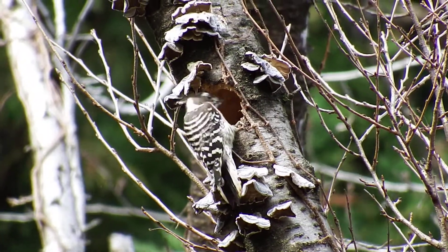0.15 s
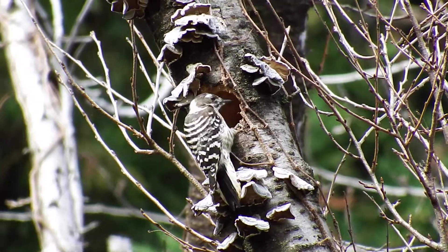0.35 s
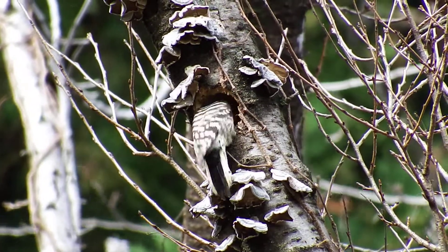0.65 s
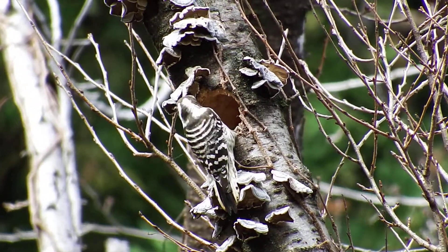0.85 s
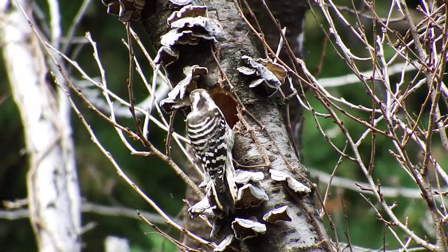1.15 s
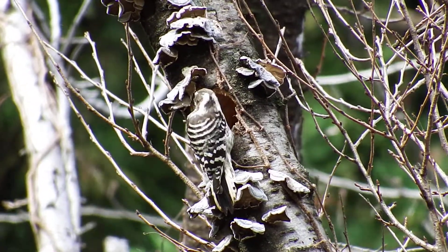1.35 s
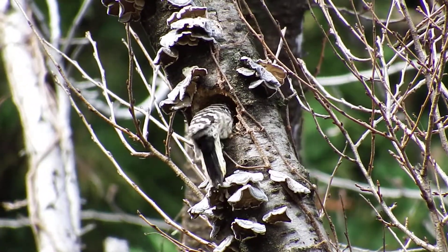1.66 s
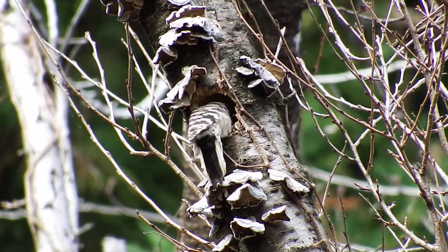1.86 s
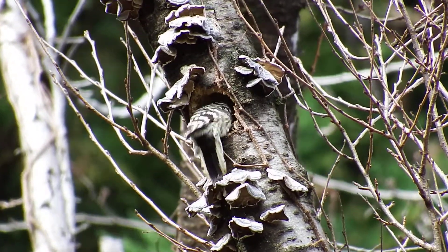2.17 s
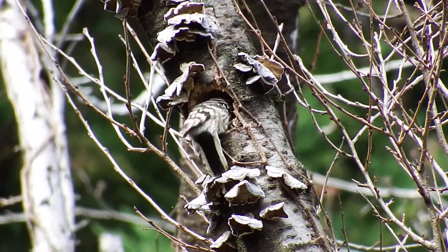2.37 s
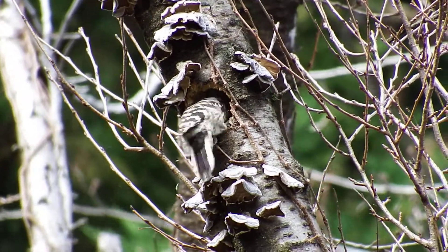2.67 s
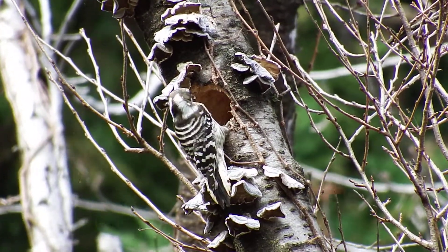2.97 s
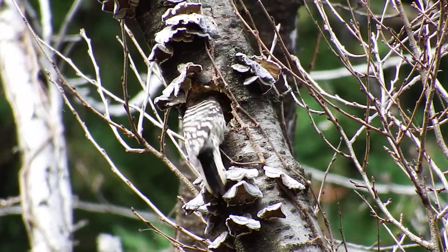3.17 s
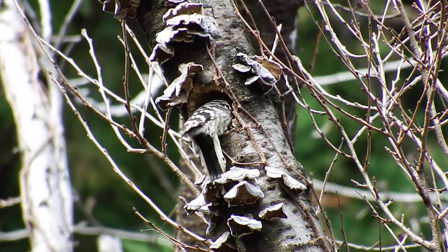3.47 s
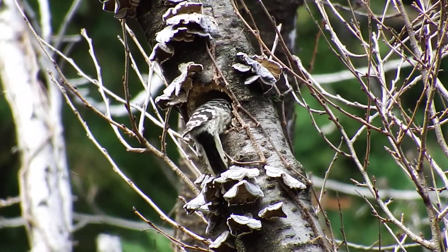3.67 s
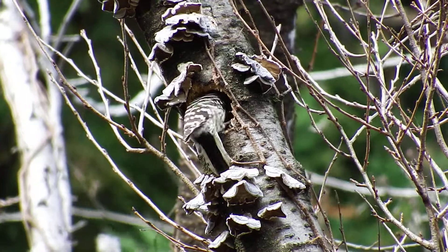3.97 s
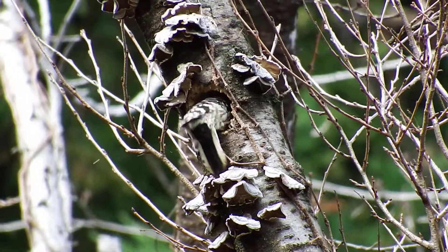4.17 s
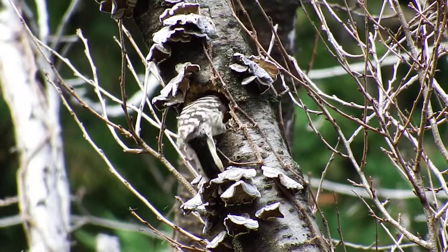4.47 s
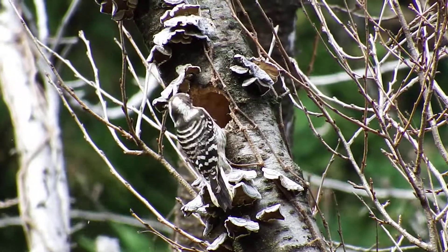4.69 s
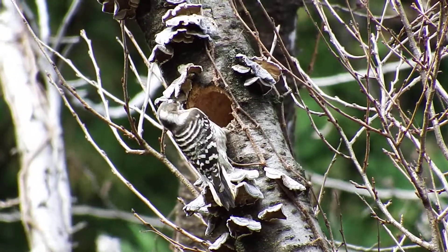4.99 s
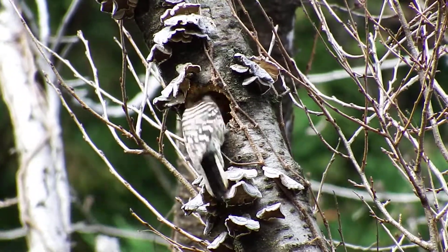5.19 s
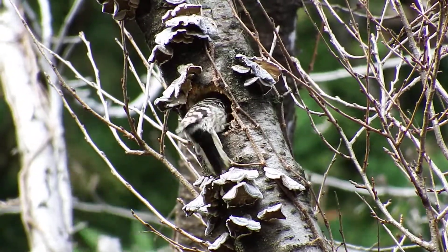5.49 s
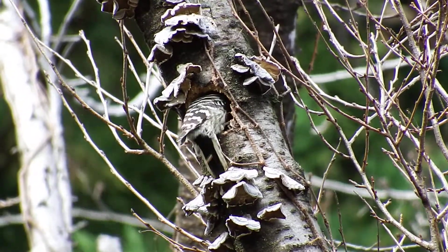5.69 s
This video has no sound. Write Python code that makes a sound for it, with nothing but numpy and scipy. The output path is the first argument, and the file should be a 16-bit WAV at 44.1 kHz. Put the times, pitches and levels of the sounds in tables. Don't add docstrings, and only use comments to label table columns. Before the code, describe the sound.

Outdoor woodland, breezy. A steady soft wash of leaves and slight hiss lies under small birds giving thin, gliding whistles and hoarse chirps. Wind pops and flutters low against the stereo microphone, mostly in the first four seconds. A faint far motor whines early. Around five seconds a woodpecker gives a few soft, uneven knocks, each a small tick and dull woody thud. Treble is muffled.

```python
import sys
import numpy as np
from scipy import signal
from scipy.fft import rfft, irfft
from scipy.io import wavfile
from scipy.ndimage import uniform_filter1d

SR = 44100
rng = np.random.default_rng(int(sys.argv[2]) if len(sys.argv) > 2 else 0)


def level_to_linear(level):
    exponent = np.asarray(level, float) / 20
    return 10 ** exponent


def generate_wav(signal):
    frames = np.transpose(np.atleast_2d(signal))
    scaled = np.clip(frames, -1, 1) * 32767
    pcm = np.round(scaled).astype(np.int16)
    wavfile.write(sys.argv[1], SR, pcm)


N = 257632


def level(x, db):
    return x * level_to_linear(db) / np.sqrt(np.mean(x ** 2))


def colour(x, shape):
    hz, db = np.transpose(shape)
    gain_db = np.interp(np.log(np.fft.rfftfreq(N, 1 / SR) + 1), np.log(hz), db)
    return irfft(rfft(x) * level_to_linear(gain_db), N)


def noise(shape, channels=1):
    return level(colour(rng.standard_normal((channels, N)), shape), 0)


def walk(rate, size=N):
    hold = max(int(SR / rate), 1)
    steps = np.repeat(rng.standard_normal(size // hold + 1), hold)
    slewed = uniform_filter1d(uniform_filter1d(steps, hold), hold)
    return 1.325 * slewed[:size]


def ring(modes, push_s):
    t = np.arange(SR // 10) / SR
    y = sum(level_to_linear(db) * np.sin(2 * np.pi * hz * t) * 1000. ** (-t / t60) for hz, db, t60 in modes)
    y = np.convolve(y, np.hanning(int(push_s * SR) + 3))[:len(t)]
    return y / np.abs(y).max()


def add(out, sound, s):
    i = int(s * SR)
    out[i:i + len(sound)] += sound[:N - i]


def rustle():
    # time in [s], level in [dB].
    air = [(0.0, -49), (0.75, -49.5), (2.76, -48.5), (3.64, -49.5), (4.13, -47.5), (5.84, -48)]
    # frequency in [Hz], density in [dB per Hz].
    leaf_tone = [(60, -13), (150, -16.5), (320, -2), (560, -1.5), (760, 0), (1400, -0.5), (2050, 1.5),
                 (2400, -4.5), (3000, -1.5), (3900, -0.5), (5000, -4.5), (8000, -5)]
    s, db = np.transpose(air)
    field = noise(leaf_tone) + 0.12 * noise(leaf_tone, channels=2)
    return field * level_to_linear(np.interp(np.arange(N) / SR, s, db) + 8 + .5 * walk(6))


def wind():
    # frequency in [Hz], density in [dB per Hz].
    rumble_tone = [(20, 12.5), (90, 3.5), (150, -2.5), (300, -7.5), (500, -17.5), (900, -53)]
    # peak in [s], half length in [s], rumble in [dB],
    # left minus right in [dB].
    gust_rows = [(0.12, 0.048, -75, -15), (0.485, 0.13, -60, 7), (0.854, 0.14, -81, 1),
                 (1.147, 0.087, -66, -2), (3.4, 0.21, -73, 8), (1.624, 0.1, -76, 6), (1.44, 0.08, -60, 2),
                 (1.85, 0.17, -63, 4), (2.207, 0.16, -61, 7), (2.416, 0.16, -60.5, 16.5),
                 (2.78, 0.19, -57, 2), (3.108, 0.12, -58, -5), (3.764, 0.044, -60, 4),
                 (4.2, 0.041, -70.5, 13), (4.462, 0.034, -65, -3), (4.965, 0.12, -65, -8),
                 (5.31, .07, -69, 5)]
    # time in [s], peak in [dB], deep part in [dB].
    pops_left = [(0.459, -53, 8), (0.592, -52, 10), (1.398, -25.5, -8.5), (1.409, -37, -2),
                 (1.474, -37, -16), (1.499, -31, -25), (2.096, -36, -7), (2.124, -30.5, -14),
                 (2.195, -39, -13), (2.236, -33.5, 2), (2.264, -30, -10), (2.305, -34, -21),
                 (2.325, -27, -25), (2.335, -27.5, -27), (2.364, -35, -13), (2.402, -31, -31),
                 (2.426, -31, -24), (2.477, -31.5, 0), (2.653, -31, -6), (2.734, -32, -7),
                 (2.793, -30.5, -21), (2.821, -35, 2), (2.859, -30.5, -24), (2.893, -37, -2),
                 (3.082, -30, -16), (3.132, -38, 8), (3.528, -30.5, -11), (3.606, -35.5, 16),
                 (3.859, -40, 9), (5.307, -39, 11)]
    # time in [s], peak in [dB], deep part in [dB].
    pops_right = [(0.099, -46, 8), (0.131, -55, 8), (0.316, -34.5, -15), (0.43, -33, 13), (1.204, -49, 8),
                  (1.468, -53, 6), (2.045, -35.5, -10), (2.318, -36, -6), (2.352, -34, 6), (2.648, -42, 4),
                  (2.715, -50, 4), (3.052, -41, 11), (3.09, -27.5, -6), (3.104, -31, -12), (3.127, -30, -1),
                  (3.255, -27, -15), (3.765, -50, 8), (4.465, -56, 8)]
    calm_db, calm_fall_db_per_s = -70, 1
    t = np.arange(N) / SR
    out = noise(rumble_tone, channels=2)
    for port, lean, pops in zip(out, (.5, -.5), (pops_left, pops_right)):
        gust = level_to_linear(calm_db - calm_fall_db_per_s * t)
        for s, half_s, db, side_db in gust_rows:
            gust += level_to_linear(db + lean * side_db) * np.exp(-((t - s) / half_s) ** 2)
        port *= gust * level_to_linear(8.5 + 9.5 * np.minimum(walk(45), 1.2))
        for (at, peak_db, deep_db), chance in zip(pops, rng.standard_normal((len(pops), 2))):
            main = (320 * (1 + 0.11 * chance[0]), 0, .022)
            deep = (145 * (1 + .2 * chance[1]), deep_db + 0.5, .04)
            add(port, level_to_linear(peak_db) * ring([main, deep], 0.0017), at - .0025)
    return out


def birds():
    # start in [s], end in [s], rate in [Hz], pitch swing in [Hz], depth [0-1].
    trills = [(0.14, 0.21, 46, 330, 0.9), (1.84, 2.2, 87, 130, 0.2), (4.63, 4.77, 210, 180, 0.6),
              (6.7, 5.6, 68.9, 230, 0.26), (4, 6, 160, 110, 0.4)]
    flicks = [(1.143, 0.012, 2500, 4800, -39.5), (1.467, 0.026, 2130, 4550, -37),
              (4.843, .011, 2580, 3700, -39.5), (1.252, 0.03, 4380, 2340, -40.5),
              (1.285, 0.015, 4340, 2900, -38.5), (3.412, .022, 4080, 3450, -40),
              (1.637, .023, 3980, 2880, -46)]
    climbs = [(1.156, 0.068, 4280, 5680, -34.5), (1.488, .095, 4400, 6800, -39),
              (1.705, 0.085, 4420, 5430, -40.5), (2.752, 0.079, 4330, 6690, -47),
              (3.015, 0.052, 4370, 5130, -40)]
    rises = [(.09, 0.088, 4050, 4420, -45.5), (.312, 0.021, 3950, 4520, -39),
             (.375, 0.023, 3370, 3620, -45.5), (.462, .04, 3500, 3720, -44),
             (2.42, 0.094, 3060, 3375, -47.5), (2.505, .04, 2970, 3460, -39),
             (2.705, .075, 2740, 3523, -39), (2.775, 0.11, 3700, 4043, -41),
             (2.96, 0.087, 4120, 4450, -44.5), (3.335, 0.057, 4140, 4360, -40),
             (3.76, 0.1, 4170, 4540, -46), (3.92, .09, 3510, 3830, -51), (4.0, 0.13, 3760, 3860, -52),
             (4.46, .09, 3675, 4075, -43.5), (4.55, 0.074, 4230, 4720, -46), (4.92, .16, 3390, 3440, -46.5),
             (4.78, 0.041, 3800, 3920, -48), (4.875, 0.054, 3820, 3910, -42.5),
             (4.93, 0.099, 4055, 4205, -41.5), (5.04, .075, 4260, 4520, -43), (5.11, .065, 4500, 4600, -43),
             (5.35, .08, 3454, 4220, -41), (5.53, 0.037, 3800, 4360, -46.5), (5.655, .095, 3720, 4350, -41)]
    falls = [(0.001, 0.02, 3970, 3880, -37.5), (.165, 0.045, 4360, 4160, -50),
             (.185, .08, 4150, 3700, -45.5), (.332, 0.052, 4470, 3910, -42.5),
             (.498, 0.037, 3720, 3520, -43), (.55, 0.047, 3370, 3200, -49),
             (2.035, 0.059, 3500, 3430, -46.5), (2.29, .07, 3704, 3636, -45.5),
             (2.545, 0.12, 3410, 3398, -39), (2.81, 0.11, 3380, 3344, -45), (3.07, 0.072, 4050, 3976, -46),
             (3.22, 0.056, 4350, 4090, -48), (3.293, 0.047, 4520, 4140, -42),
             (3.385, .03, 4330, 4050, -39.5), (3.86, 0.081, 4400, 3950, -45.5),
             (4.645, .115, 3870, 3520, -47), (4.76, .06, 5700, 5630, -46), (4.825, 0.049, 4140, 3756, -39),
             (4.92, 0.078, 4630, 4380, -46), (5.17, 0.043, 4540, 4590, -39), (5.225, 0.12, 4654, 4510, -44),
             (5.46, 0.079, 4150, 3750, -47), (5.565, 0.025, 4220, 3880, -40.5),
             (5.77, .04, 5490, 5410, -51)]
    chirrs = [(1.17, 0.09, 3800, 3800, -49), (1.225, 0.064, 5600, 4740, -40),
              (1.585, 0.041, 6750, 5300, -39), (1.77, .16, 4150, 4050, -42.5),
              (1.91, 0.083, 4100, 4050, -52), (1.795, .1, 3500, 3150, -42), (2.29, .08, 3500, 3800, -49),
              (5.44, 0.09, 3600, 3700, -46.5), (2.77, 0.15, 3523, 3700, -44),
              (2.18, .07, 3105, 3110, -49.5), (2.0, 0.122, 3600, 3700, -51), (2.95, .2, 3600, 3900, -50),
              (3.06, 0.13, 4800, 4400, -50), (3.92, 0.16, 4200, 3990, -47.5),
              (4.17, .16, 2900, 3300, -47.5), (4.32, 0.14, 3300, 3550, -51), (4.4, 0.16, 3890, 4000, -49),
              (4.66, 0.04, 2960, 2900, -61), (5.05, 0.21, 5300, 5200, -46), (5.3, 0.26, 5250, 4700, -49)]
    # notes, pitch bend (under 1 early, over 1 late), crest place [0-1],
    # ends under crest in [dB], pitch wander in [Hz], left minus right in [dB].
    kinds = [(flicks, .9, .5, 6, 30, -1.5), (climbs, .75, .35, 4, 40, 0), (rises, .7, .6, 4, 75, -1.2),
             (falls, 1.3, .3, 3, 70, -1.2), (chirrs, 1, .45, 5, 320, -1)]
    edge_s = .008
    t, out = np.arange(N) / SR, np.zeros((2, N))
    swing_hz, pulse = np.zeros(N), np.ones(N)
    for start, end, rate, hz, depth in trills:
        beat = ((t > start) & (t < end)) * np.sin(2 * np.pi * rate * (t - start))
        swing_hz += hz * np.roll(beat, int(SR / rate / 4))
        pulse += np.clip(depth, 0, 1) * beat
    wander, flutter = walk(700), walk(140)
    for kind, (notes, bend, crest, fade_db, hoarse_hz, side_db) in enumerate(kinds):
        for row, (s, length, first_hz, last_hz, db) in enumerate(notes):
            span = slice(int(s * SR), int((s + length) * SR))
            size = len(t[span])
            u = np.arange(size) / size
            own = slice(4001 * row + 30011 * kind, None)
            glide_hz = first_hz + (last_hz - first_hz) * u ** bend
            pitch = glide_hz + swing_hz[span] + hoarse_hz * wander[own][:size]
            swell_db = -fade_db * np.interp(u, [0, np.clip(crest, .1, .9), 1], [1, 0, 1]) ** 2
            flutter_db = 3.2 * flutter[own][:size]
            edges = signal.windows.tukey(size, min(edge_s * SR / size, 1))
            loud = level_to_linear(db + swell_db + flutter_db) * pulse[span] * edges
            phase = 2 * np.pi * np.cumsum(pitch) / SR
            song = np.sqrt(2) * loud * (np.sin(phase) + level_to_linear(-27) * np.sin(2 * phase))
            out[:, span] += np.outer([level_to_linear(side_db / 2), level_to_linear(-side_db / 2)], song)
    return out


def burst(hz, seconds):
    size = int(seconds * SR)
    return np.hanning(size) * np.sin(2 * np.pi * hz * np.arange(size) / SR)


def woodpecker():
    # tick in [s], thin tick in [dB], knock follows by [ms], knock peak in [dB],
    # contact in [ms].
    taps = [
        (.3944, -26, 3.6, -55, 1.5),
        (4.9013, -19, 3.7, -50, 1.5),
        (4.9474, -13, 4.2, -25.5, .8),
        (5.0502, -13, 3.6, -26.5, 2.1),
        (5.104, -40, 3, -38, 2),
        (5.2035, -21, 2.3, -26, 2.1),
        (5.405, -45, 3, -37, 1.4),
        (5.7972, -32, 2.8, -55, 1.5),
    ]
    # frequency in [Hz], level in [dB], t60 in [s].
    trunk = [(440, 0, .021), (700, -2, .014), (280, -12, .05)]
    # frequency in [Hz], gain in [dB].
    radiation = [(140, -26), (350, 0)]
    out = np.zeros(N)
    for tick_s, thin_db, lag_ms, knock_db, contact_ms in taps:
        add(out, level_to_linear(thin_db) * burst(7800, .0011), tick_s)
        broad_db = min(thin_db, -24)
        add(out, level_to_linear(broad_db) * burst(5600, .0007), tick_s)
        knock = -ring(trunk, contact_ms / 1000)
        peak_s = np.argmax(knock) / SR
        add(out, level_to_linear(knock_db) * knock, tick_s + lag_ms / 1000 - peak_s)
    return colour(out, radiation)


def motor():
    # time in [s], pitch in [Hz], level in [dB].
    whine = [(.75, 742, -63), (.95, 742.4, -61), (1.2, 751, -66), (1.4, 753, -63), (1.75, 765, -59.5),
             (2.0, 744, -68), (2.351, 760, -81)]
    s, hz, db = np.transpose(whine)
    t = np.arange(N) / SR
    phase = 2 * np.pi * np.cumsum(np.interp(t, s, hz)) / SR
    return np.sqrt(2) * level_to_linear(np.interp(t, s, db, -120, -120)) * np.sin(phase)


def trees(x, t60, wet_db, apart):
    t = np.arange(SR // 2) / SR
    common, own = rng.standard_normal(len(t)), rng.standard_normal((2, len(t)))
    tail = (common + apart * own) * 1000. ** (-t / t60)
    tail *= level_to_linear(wet_db) / np.sqrt(np.mean(np.sum(tail ** 2, axis=1)))
    return x + signal.fftconvolve(np.atleast_2d(x), tail, axes=1)[:, :N]


def scene():
    left_db, right_lag_s = -2, 1.8e-5
    far = rustle() + motor()
    far = far + trees(level_to_linear(-3.5) * birds(), t60=0.45, wet_db=-2.2, apart=0.15)
    far = far + trees(level_to_linear(1.0) * woodpecker(), t60=0.092, wet_db=-16, apart=0.26)
    turn = np.exp(-2j * np.pi * np.fft.rfftfreq(N, 1 / SR) * right_lag_s)
    right = irfft(rfft(far[1]) * turn, N)
    return np.array([far[0] * level_to_linear(left_db / 2), right * level_to_linear(-left_db / 2)]) + wind()


def low_pass(x):
    return signal.sosfilt(signal.butter(12, 15700, fs=SR, output="sos"), x)


def record(dry):
    # frequency in [Hz], gain in [dB].
    treble_cut = [(4000, 0), (4400, -5), (5000, -19), (6000, -29), (8000, -39)]
    # centre in [Hz], width in [Hz].
    notches = [(222, 31), (1100, 113)]
    # frequency in [Hz], density in [dB per Hz].
    hiss_tone = [(200, -4.5), (5000, 3), (10000, -2.5), (16000, -7.5)]
    bass_cut = signal.butter(4, 143.5, "high", fs=SR, output="sos")
    x = signal.sosfilt(bass_cut, colour(dry, treble_cut))
    for hz, width in notches:
        x = signal.lfilter(*signal.iirnotch(hz, hz / width, SR), x)
    hiss = noise(hiss_tone, channels=2) + 0.28 * noise(hiss_tone)
    return low_pass(x + level(hiss, -66))


dry = scene()
out = record(dry)
generate_wav(out)
```